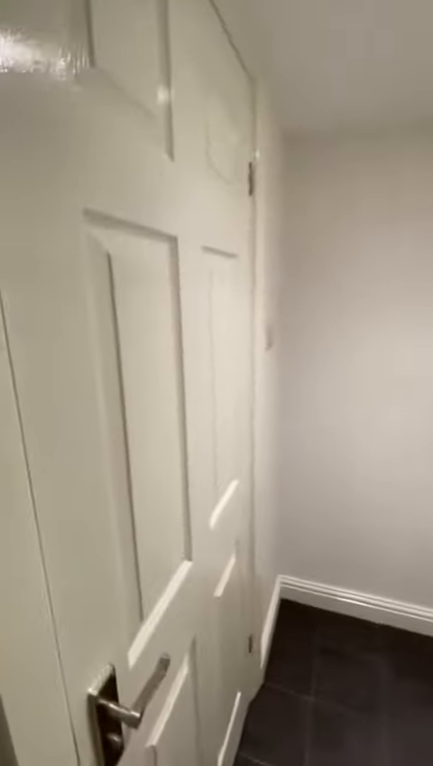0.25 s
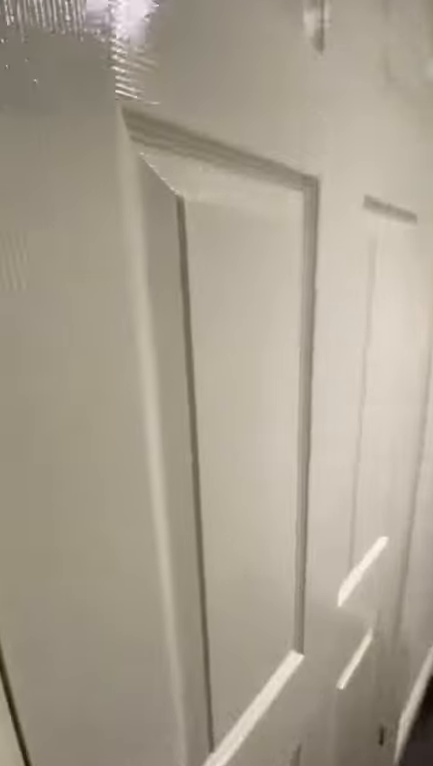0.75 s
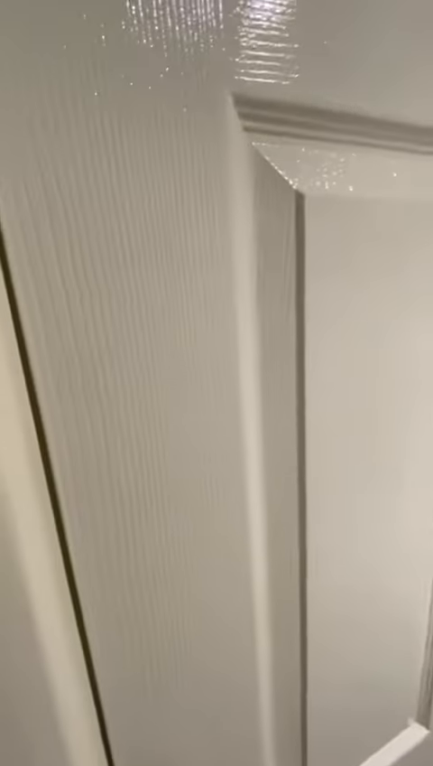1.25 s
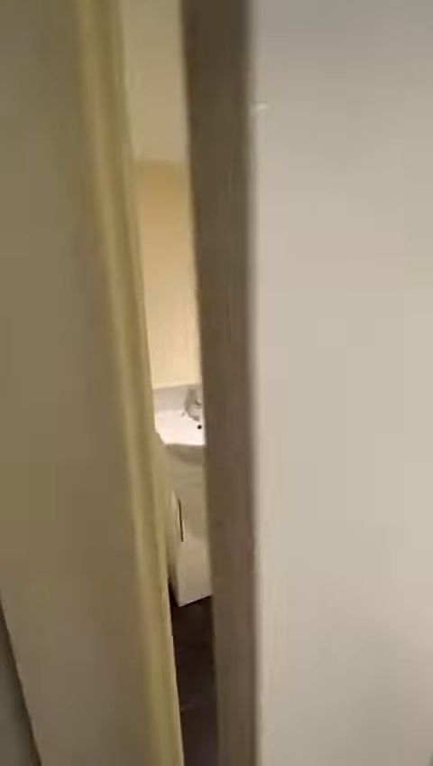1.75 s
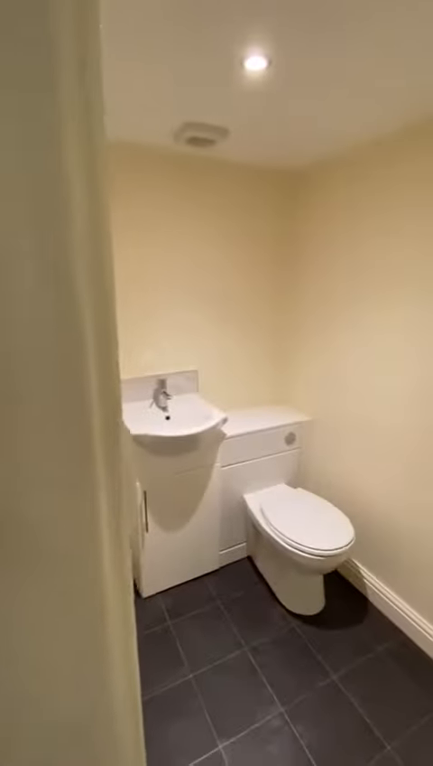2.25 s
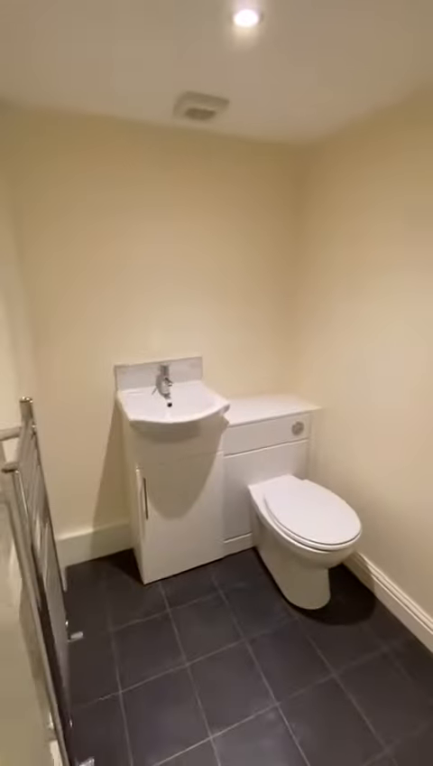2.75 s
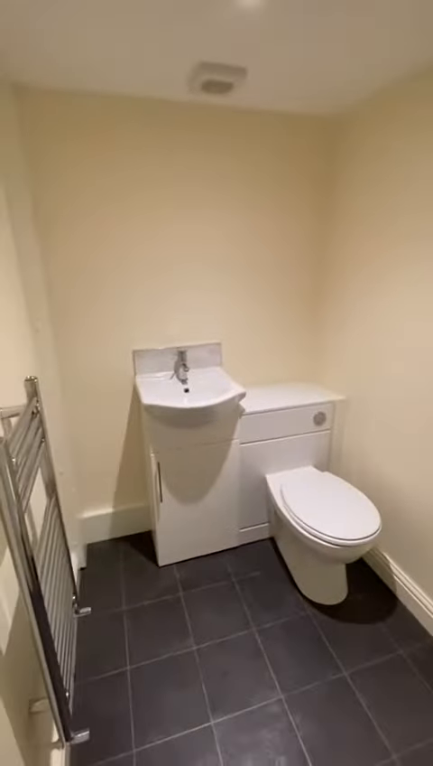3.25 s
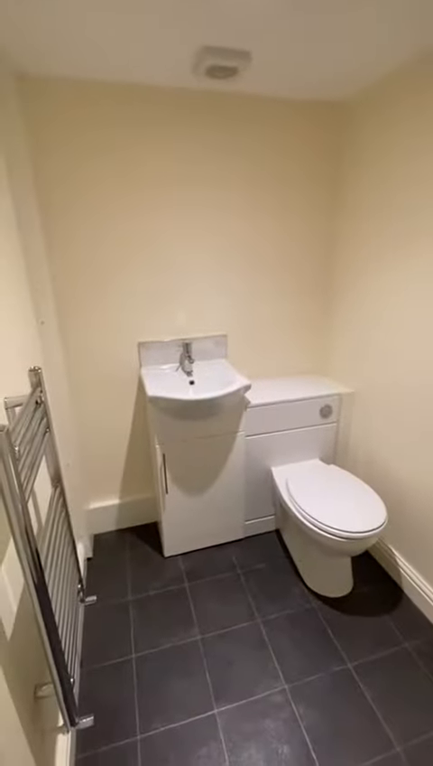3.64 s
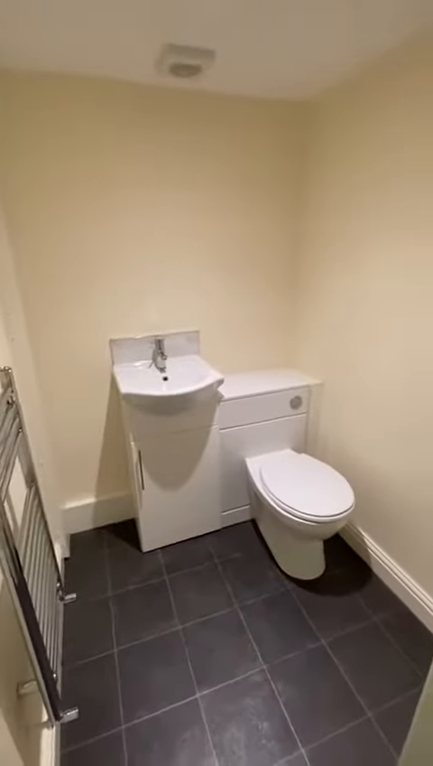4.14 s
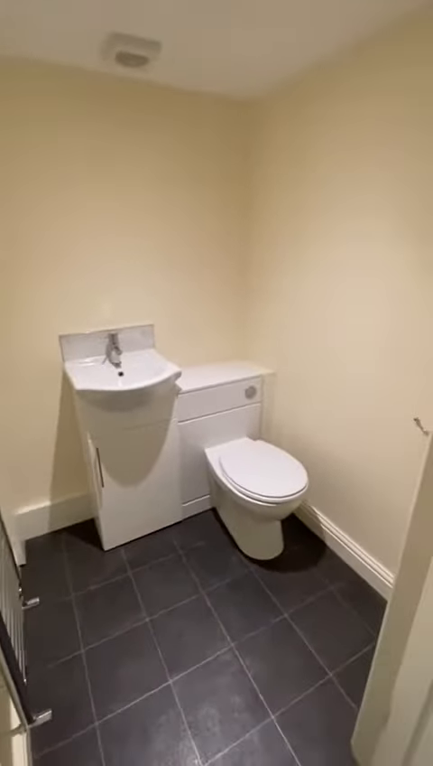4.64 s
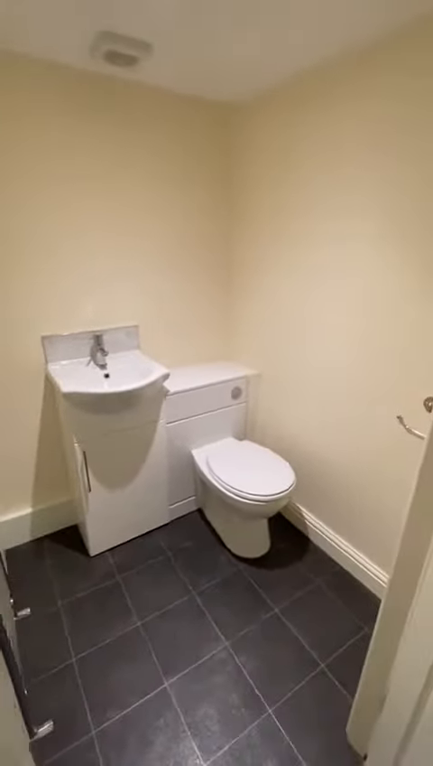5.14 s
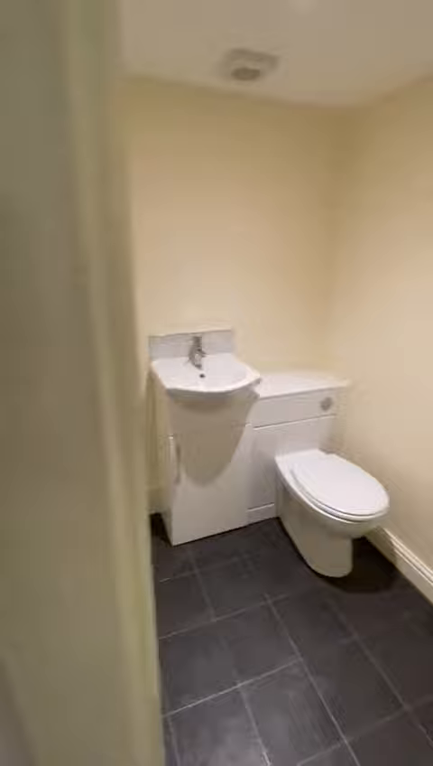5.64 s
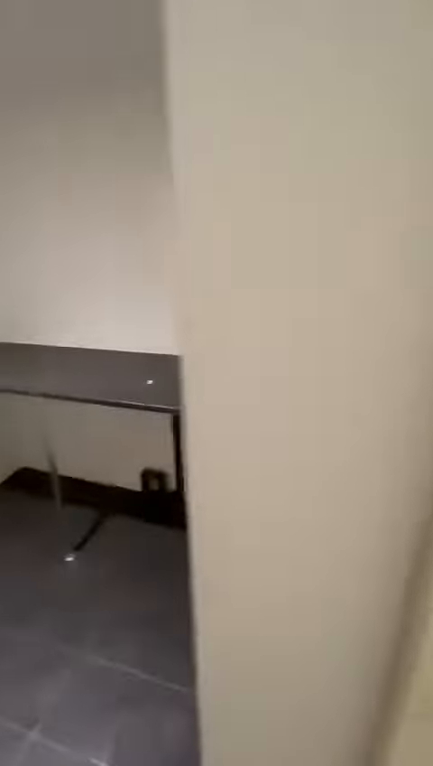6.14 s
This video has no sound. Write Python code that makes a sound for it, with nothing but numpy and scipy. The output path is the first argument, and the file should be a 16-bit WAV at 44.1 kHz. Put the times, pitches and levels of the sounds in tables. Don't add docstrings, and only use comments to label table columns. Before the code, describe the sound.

Close handheld stereo pickup indoors: first a muffled low hum and sleeve rustles, then handle clicks, a sharp woody latch clack, low door thumps and a short squeaky hinge. Soft steps and air bumps follow as the fan becomes much louder, its tonal drone wavering as the listener moves. Only faint rustles and a tiny tick interrupt it before the hum dulls slightly on leaving.

```python
import sys
import numpy as np
from scipy import signal
from scipy.fft import rfft, irfft
from scipy.io import wavfile
from scipy.ndimage import uniform_filter1d

SR = 44100
rng = np.random.default_rng(int(sys.argv[2]) if len(sys.argv) > 2 else 0)


def linear_from_db(decibels):
    return 10 ** (np.asarray(decibels, float) / 20)


def materialize(psi):
    bounded = np.clip(np.atleast_2d(psi).T, -1, 1)
    quanta = np.round(bounded * 32767).astype(np.int16)
    wavfile.write(sys.argv[1], SR, quanta)


N = 282240

# start_s, door_and_distance_loss_db, blade_standing_wave_db, octave_standing_wave_db (low at a node)
WALK = [(0.0, -14, -8.5, -9), (0.2, -24, -2, -5.5), (1.0, -14.5, -5, -2), (1.57, -14.5, -9.5, -3),
        (1.85, -2, -0.5, 1), (2.07, -1.5, -10, -1), (2.2, -2, -8, -8.5), (2.35, -0.5, 0.5, -1.5),
        (2.9, 0, -7.5, -3), (3.12, 0.47, -12, -4), (3.62, 0.5, -14, -5.5), (4.17, 0, -5.5, -4.5),
        (4.63, 0.28, -11.5, -6.5), (5.61, .1, -1, -4.5), (5.76, 0.5, -6.5, -5.5), (6.05, -3, 0, 3.5),
        (6.3, -6.5, -1, 6), (6.4, -6, -0.5, 1.5)]
# room_level_db at an antinode, share of the door loss, share of the standing wave
FAN_PARTS = dict(hum=(-39.5, 0.997, 0.01), blade=(-41, 0.926, 1.072), octave=(-58.5, 0.47, .01),
             low=(-49, 0.461, -0.302), high=(-46.5, 0.428, .2), air=(-53.5, 0.411, 0.015))
# pitch_hz, width_hz, level_db
SHAFT_ORDERS = [(63.9, 4.5, -19.5), (129.41, 3.2, -11), (163.87, 6.2, -5.5), (231.28, 8.3, -13.5),
                (259.8, 1, -23), (339.85, 24, -20.5), (403.6, 24, -23), (493, 4.3, -30.5)]
# freq_hz, density_db (per Hz)
DUCT_COLOUR = [(30, -25.5), (50, -22), (100, 3), (180, 0), (240, 6.5), (350, -5), (450, -23), (600, -44)]
# freq_hz, density_db (per Hz)
GRILLE_COLOUR = [(300, -15.5), (430, -6), (580, -5), (770, -2.5), (900, -3.5), (1140, -11), (1800, -14),
                 (2250, -15.5), (2600, -15.5), (3250, -14.5), (4200, -19.5), (5300, -17.5), (6000, -37),
                 (7500, -55.5)]
# pitch_hz, width_hz, level_db
SLOT_WHISTLES = [(770, 47, -17), (884.2, 2.9, -11), (2231.5, 100, -17), (3216, 110, -24.5)]
# freq_hz, side_minus_mid_db
PORT_SPREAD = [(150, -53), (330, -7), (800, -2), (1200, -1.5), (1700, -8), (2500, 2), (4500, 0.5),
               (5700, -6.5), (6300, -0.5), (7100, 9.5), (8500, 6), (9200, -3), (9900, -20), (11500, -17)]
# peak_s, level_db, fall_s (per 10 dB; negative swells slowly)
GUSTS = [(.25, -48.5, 0.24), (.8, -46, 0.05), (.93, -50, 0.29), (1.33, -37.5, 0.1128), (1.43, -43, 0.39),
         (2.0, -39.5, 0.28), (2.42, -36.5, 0.1025), (2.83, -47, 0.26), (4.3, -63, 0.04),
         (4.88, -58.5, -1.5), (5.55, -53.5, -0.29), (6.3, -58.5, 0.6)]
# peak_s, level_db, fall_s (per 10 dB), brightness_db
STROKES = [(.08, -57.5, 0.6106, 4.5), (0.532, -51.5, 0.1839, 3.5), (0.669, -53.5, 0.1469, 3.5),
           (.85, -57.5, 0.11, 1.5), (.95, -58, 0.02, -9), (1.179, -48, 0.1375, 5),
           (1.311, -40.5, 0.169, -4), (1.619, -50.5, 0.0846, 1), (1.78, -53.5, 0.4072, -1),
           (2.03, -60.5, 0.04, -2.85), (2.5, -59.5, 0.6227, 1.83), (4.3, -62, 0.37, 2.35),
           (4.7, -62.5, 0.3445, 0.14), (5.0, -70.5, 0.5043, -5.5), (5.38, -59.5, 0.1933, -0.67),
           (5.52, -55.5, 0.11, 8), (5.8, -65.5, 0.42, 6)]
# freq_hz, density_db (per Hz)
RUSTLE_COLOUR = [(500, -28), (900, 5.5), (1500, 0.84), (2800, 4), (4500, 2), (5600, 2), (6500, -2),
                 (7500, -26)]
# freq_hz, density_db (per Hz)
FIZZ_COLOUR = [(5500, -19), (6500, 10.5), (7500, 4), (8500, 3), (9500, 0.5), (10500, -1), (11400, -4.5),
               (12000, -22)]
# start_s, pitch_hz, level_db, t60_s
KNOCKS = [
    (1.292, 1450, -19, 0.0666),
    (1.416, 1113, -35.5, 0.274),
    (.001, 524.5, -42.5, 0.407),
    (.911, 323, -24.5, 0.13),
    (2.513, 640, -36, 0.045),
    (5.396, 11460, -54.5, .4),
]
# start_s, body_db, ring_db, t60_s
HANDLE = [
    (0.486, -48, -56, 0.81),
    (.747, -40.5, -41.5, 0.122),
    (0.784, -45, -44.5, 0.11),
    (0.9043, -28, -25.5, 0.0987),
    (0.918, -36, -37.5, 0.14),
    (1.1118, -43, -25.5, 0.044),
    (1.1295, -30, -27.5, 0.149),
    (1.1451, -31.5, -27.5, 0.11),
]
# start_s, body_db, ring_db, treble_db, t60_s
BOLT = [
    (1.2851, -24, -26, -14.5, 0.0257),
    (1.293, -43, -40.5, -24, 0.089),
    (1.3055, -37, -22, -34.5, 0.0648),
    (1.325, -38.5, -32.5, -35, 0.12),
    (1.841, -31.5, -57, -51, 0.087),
    (1.873, -38, -43.5, -42, 0.2992),
    (1.989, -50.5, -42.5, -59.5, 0.04),
    (5.5, -59, -53.5, -43, 0.485),
]
# freq_hz, density_db (per Hz)
LATCH_COLOUR = [(150, -40), (250, 2.5), (504, -12), (865, -2), (1410, -19.5), (1580, -7), (1950, -27.5),
                (2270, -10.5), (5000, -31.5), (6500, -55), (11000, -120)]
# peak_s, level_db, fall_s (per 10 dB; negative swells slowly)
JOLTS = [(1.12, -47.5, 0.1134), (1.14, -45, 0.54), (1.18, -32.5, 0.1244), (1.215, -32.5, 0.0884),
         (1.424, -34.5, 0.14), (1.5, -39.5, 0.28), (1.62, -40.5, 0.0963), (1.79, -34.5, 0.11),
         (1.87, -35, 0.02), (1.92, -35.5, 0.0047), (2.04, -43.5, -0.53)]
# freq_hz, density_db (per Hz)
LEAF_COLOUR = [(59, -14), (100, -0.5), (124, -12.5), (215, -6.5), (568, -14), (633, -13), (1070, -19.5),
               (1160, -20), (2500, -28.5), (3250, -38), (5500, -120)]
# start_s, peak_db, pitch_hz, length_s, glide (share)
THUDS = [
    (1.176, -31.5, 110.5, 0.102, -0.068),
    (1.21, -22.5, 68.2, 0.0808, -0.054),
    (1.282, -24.5, 51.3, 0.1196, -0.059),
    (1.929, -27.5, 59.85, 0.04112, 0.043),
    (2.206, -36.5, 100.7, 0.095, 0.256),
    (2.31, -31, 85.3, 0.0296, 0.088),
    (2.429, -27.5, 65.3, 0.044, 0.103),
    (2.525, -33.5, 50.5, 0.061, 0.00087),
]
# start_s, length_s, pitch_hz, level_db, roughness (0-1)
CREAKS = [(1.286, 0.063, 630.6, -41, 0.08), (1.41, 0.0228, 841.4, -37, 0.17),
          (1.517, 0.0112, 1292, -33, 0.2), (1.597, 0.0412, 997.5, -39.5, 0.18),
          (1.62, 0.06, 855, -41.5, 0.79), (1.67, 0.091, 970, -46, 0.8), (1.725, 0.088, 832, -38, 0.01),
          (1.79, 0.017, 389, -29.5, 0.5), (1.845, 0.024, 336.2, -32.5, 0), (1.89, 0.025, 304, -39, 0.3),
          (1.879, 0.065, 814.6, -43.5, 0.63), (5.08, 0.105, 2269, -54.5, 0.37)]
# start_s, length_s, pitch_hz, level_db, roughness (0-1)
SQUEAL = [
    (1.6, 0.051, 2436, -55, 0.95),
    (1.635, 0.05274, 2372, -47.5, 0.65),
    (1.684, 0.04, 2367, -27, 0.12),
    (1.708, 0.04, 2374, -30.5, 0.12),
    (1.735, 0.0476, 2345, -43.5, 0.36),
    (1.778, 0.069, 2362, -44.5, 0.26),
    (1.83, 0.082, 2375, -55, .95),
    (1.89, 0.133, 2372, -60.5, 0.91),
]
# freq_hz, below_neighbours_db
MASKING = [(100, -26), (700, -17.5), (1200, -7), (1700, -10), (3000, -3.5), (4200, -3), (6000, -3),
           (9000, -0.5), (11500, -2), (11900, 14)]

HUM_HZ, BEAT_HZ, BEAT_DB, BLADE_HZ = 200.0, 197.16, -13, 306.6
PAN_AT_ANTINODE_DB, PAN_PER_DB = -5.5, -1.4755
TREBLE_HZ, TREBLE_SHARE = 1300, .6
STILL_AIR_DB, STILL_CLOTH_DB, STILL_FIZZ_DB, FIZZ_DB = -63.5, -77, -92, -20
GUST_RISE, STROKE_RISE, JOLT_RISE = 0.78, 0.484, 0.639
HANDLE_HZ, HANDLE_EDGE_DB, BOLT_HZ = 1986, -26.5, 3387
KNOCK_BODY_DB, KNOCK_EDGE_DB = -14.5, -26
HANDLE_RING_SHARE, BODY_RISE_S = .4, 0.0026
ROOM_T60_S = 0.33
AUDIBLE_DB, ATTACK_DB = -82, 3


def rms_one(x):
    return x / np.sqrt(np.mean(x ** 2) + 1e-20)


def in_time(rows):
    s, *columns = np.transpose(rows)
    return [np.interp(np.arange(N) / SR, s, column) for column in columns]


def shape(spectrum, outside=-90):
    hz, db = np.transpose(spectrum)
    log_hz = np.log(np.arange(N // 2 + 1) * SR / N + 1e-3)
    return linear_from_db(np.interp(log_hz, np.log(hz), db, left=outside, right=outside))


def peak(hz, width_hz):
    offset = np.arange(N // 2 + 1) * SR / N - hz
    return 1 / (1 + (2 * offset / width_hz) ** 2)


def filtered_noise(gain):
    return rms_one(irfft(rfft(rng.standard_normal(N)) * gain, N))


def drift(hz):
    return filtered_noise(peak(0, 2 * hz))


def panned(x, db):
    return x * linear_from_db(np.array([db / 2, -db / 2]).reshape(2, -1))


def wide(mid, side):
    return np.array([mid + side, mid - side])


def diffuse(gain):
    ratio = shape(PORT_SPREAD, outside=-29.5)
    shares = np.array([np.ones_like(ratio), ratio]) / np.sqrt(1 + ratio ** 2)
    mid, side = irfft(rfft(rng.standard_normal((2, N))) * gain * shares, N)
    return rms_one(wide(mid, side))


def resonant(hz, width_hz, size):
    r = np.exp(-np.pi * width_hz / SR)
    zeros = [1, 0.0031, -1.014]
    poles = [1, -2 * r * np.cos(2 * np.pi * hz / SR), r * r]
    once = signal.lfilter(zeros, poles, rng.standard_normal(size))
    return rms_one(signal.lfilter(zeros, poles, once))


def humps(rows, rise, floor_db):
    t = np.arange(N) / SR
    power = linear_from_db(2 * floor_db)
    for s, db, fall in rows:
        away = np.maximum((t - s) / fall, (s - t) / (rise * fall))
        power = power + linear_from_db(2 * db - 20 * away)
    return 10 * np.log10(power)


def swell(s, length, rise):
    part = np.arange(int(length * SR)) / (length * SR)
    start = int(s * SR)
    return slice(start, start + len(part)), part, np.sin(np.pi * part ** rise)


def along_walk(part):
    loss_db, wave_db, octave_wave_db = in_time(WALK)
    room_db, loss_share, wave_share = FAN_PARTS[part]
    standing_db = octave_wave_db if part == "octave" else wave_share * wave_db
    return room_db + loss_share * loss_db + standing_db


def motor(hum_db, blade_db, pan_db, octave_db):
    turn = 2 * np.pi * np.arange(N) / SR
    lead = np.array([[.4], [-.4]])
    hum = np.sin(HUM_HZ * turn + lead / 7) + linear_from_db(BEAT_DB) * np.sin(BEAT_HZ * turn - 1.45)
    hum = np.sqrt(2) * linear_from_db(hum_db + 0.85 * drift(26.0)) * hum
    blade_phase = BLADE_HZ * turn + 1.625 * drift(0.76)
    blades = np.sqrt(2) * linear_from_db(blade_db + 0.5 + .4 * drift(3.9)) * np.sin(blade_phase + lead)
    octave = np.sin(2 * blade_phase + 0.17 * drift(6.0))
    octave = linear_from_db(octave_db + 2.0 + 1.3 * drift(7.9)) * octave
    return panned(hum, -.2) + panned(blades, pan_db) + panned(octave, -1.6)


def shaft_in_duct():
    duct = rms_one(shape(DUCT_COLOUR))
    for hz, width_hz, db in SHAFT_ORDERS:
        duct = duct + linear_from_db(db + 4.0) * rms_one(peak(hz, width_hz))
    below = np.arange(len(duct)) * SR / N < HUM_HZ
    low = linear_from_db(along_walk("low") + 1.5) * diffuse(duct * below)
    high = linear_from_db(along_walk("high") + 2.0) * diffuse(duct * ~below)
    return low + high


def shaded(air):
    top = signal.sosfilt(signal.butter(1, TREBLE_HZ, "high", fs=SR, output="sos"), air)
    loss_db = np.maximum(in_time(WALK)[0], -8.0)
    return air - top + linear_from_db(TREBLE_SHARE * loss_db) * top


def grille_air():
    colour = rms_one(shape(GRILLE_COLOUR))
    for hz, width_hz, db in SLOT_WHISTLES:
        colour = colour + linear_from_db(db) * rms_one(peak(hz, width_hz))
    return shaded(linear_from_db(along_walk("air") + 2.0 + 1.2 * drift(4.1)) * diffuse(colour))


def fan():
    pan_db = PAN_AT_ANTINODE_DB + PAN_PER_DB * in_time(WALK)[1]
    tones = motor(along_walk("hum"), along_walk("blade"), pan_db, along_walk("octave"))
    return tones + shaft_in_duct() + grille_air()


def buffeting():
    lumps = shape([(20, -29.5), (35, -1.5), (55, 4.0), (90, 4.5), (130, -17.5)])
    level_db = humps(GUSTS, GUST_RISE, STILL_AIR_DB) + 2.5 * drift(8.0)
    return linear_from_db(level_db) * wide(filtered_noise(lumps), linear_from_db(-20) * filtered_noise(lumps))


def sleeve():
    rustle_rows = [(s, db, fall) for s, db, fall, _ in STROKES]
    fizz_rows = [(s, db + FIZZ_DB + bright_db, fall) for s, db, fall, bright_db in STROKES]
    rustle_db = humps(rustle_rows, STROKE_RISE, STILL_CLOTH_DB)
    fizz_db = humps(fizz_rows, STROKE_RISE, STILL_FIZZ_DB)
    rustle = linear_from_db(rustle_db - 0.88 + 1.8 * drift(23.0)) * diffuse(shape(RUSTLE_COLOUR))
    fizz = linear_from_db(fizz_db + 8.5 + 1.0 * drift(8.6)) * diffuse(shape(FIZZ_COLOUR))
    return rustle + fizz


def contacts():
    knocks = [(s, db + KNOCK_BODY_DB, hz, db, db + KNOCK_EDGE_DB, t60, t60) for s, hz, db, t60 in KNOCKS]
    handle = [(s, body, HANDLE_HZ, ring, ring + HANDLE_EDGE_DB, t60, HANDLE_RING_SHARE * t60)
              for s, body, ring, t60 in HANDLE]
    bolt = [(s, body, BOLT_HZ, ring, edge, t60, t60) for s, body, ring, edge, t60 in BOLT]
    return knocks + handle + bolt


def clicks():
    age = np.arange(SR // 4) / SR
    body = filtered_noise(shape(LATCH_COLOUR))
    treble = diffuse(shape([(3000, 4.5), (4500, 2.57), (7000, 0.5), (9000, -3.0), (11800, -11.5)]))
    metal_onset = 1 - np.exp(-age / .0004)
    wood_onset = 1 - np.exp(-age / BODY_RISE_S)
    out = np.zeros((2, N))
    for s, body_db, hz, ring_db, treble_db, t60, metal_t60 in contacts():
        span = slice(int(s * SR), int(s * SR) + len(age))
        wood = linear_from_db(body_db - 6.0 - 60 * age / max(t60, .01)) * wood_onset * body[span]
        ring = linear_from_db(ring_db - 10.5) * resonant(hz, 0.49 * hz, size=len(age))
        metal = panned(ring, -2.2) + linear_from_db(treble_db - 7.5) * treble[:, span]
        metal_decay = linear_from_db(-60 * age / max(metal_t60, .01))
        out[:, span] += panned(wood, -2.2) + metal_onset * metal_decay * metal
    return out


def shudder():
    db = humps(JOLTS, JOLT_RISE, floor_db=-94.5)
    return linear_from_db(db - 4.5 + 2.3 * drift(21.0)) * diffuse(shape(LEAF_COLOUR))


def thuds():
    out = np.zeros(N)
    for s, db, hz, length, glide in THUDS:
        span, part, hump = swell(s, length, rise=0.853)
        cycles = hz * length * (part + glide * part ** 2)
        out[span] += linear_from_db(db) * hump * np.sin(2 * np.pi * cycles)
    return panned(out, 0.78)


def slips(rows, octave_db, spread):
    out = np.zeros(N)
    for s, length, hz, db, rough in rows:
        span, part, hump = swell(s, length, rise=0.708)
        phase = 2 * np.pi * hz * length * part
        clean = np.sin(phase) + linear_from_db(octave_db) * np.sin(2 * phase)
        grit = resonant(hz, spread * hz, size=len(part))
        out[span] += linear_from_db(db) * hump ** 0.76 * ((1 - rough) * clean + rough * grit)
    return out


def hinge():
    creaks = slips(CREAKS, octave_db=-22, spread=0.211)
    squeal = slips(SQUEAL, octave_db=-22, spread=0.019)
    return panned(creaks, -1.0) + panned(squeal, -8.0)


def room(x):
    age = np.arange(int(.6 * SR)) / SR
    tail = rng.standard_normal((2, len(age))) * linear_from_db(-60 * age / ROOM_T60_S) * (age > .004)
    tail = tail / np.sqrt(np.sum(tail ** 2, axis=1, keepdims=True))
    tail = signal.lfilter([.5], [1, -.5], tail)
    return signal.fftconvolve(x.mean(axis=0)[None], tail, axes=1)[:, :N]


def masked(x, start, size=1024, count=4):
    n, k = np.arange(2 * size) + .5, np.arange(size) + .5
    window = np.sqrt(2 / size) * np.sin(np.pi * n / (2 * size))
    basis = window[:, None] * np.cos(np.pi / size * np.outer(n + size / 2, k))
    pad = 2 * size - start
    padding = [(0, 0), (pad, 2 * size - (pad + N) % size)]
    blocks = np.pad([x[0] + x[1], x[0] - x[1]], padding).reshape(2, -1, size) / 2
    lines = np.concatenate([blocks[:, :-1], blocks[:, 1:]], axis=2) @ basis
    power = np.mean(lines.reshape(2, -1, size // count, count) ** 2, axis=3)
    around = uniform_filter1d(power.mean(axis=0), size=5, axis=1)
    around = uniform_filter1d(around, size=3, axis=0)
    hz, db = np.transpose(MASKING)
    mask_db = np.interp(k[::count] * SR / (2 * size), hz, db)
    mask = around * linear_from_db(2 * mask_db) + linear_from_db(2 * AUDIBLE_DB)
    treble = power[:, :, size // count // 3:].sum(axis=(0, 2))
    attack = treble > linear_from_db(2 * ATTACK_DB) * np.roll(treble, 1)
    mask[attack] *= linear_from_db(-33)
    halves = (lines * np.repeat(power > mask, count, axis=2)) @ basis.T
    joined = halves[:, 1:, :size] + halves[:, :-1, size:]
    return wide(*joined.reshape(2, -1)[:, pad - size:pad - size + N])


def scene():
    steady = fan() + buffeting() + sleeve()
    cracks = clicks()
    door = shudder() + thuds()
    squeaks = hinge()
    wet = room(linear_from_db(-5.0) * cracks + squeaks / 4)
    return steady + cracks + door + squeaks + wet


def top_cut(x):
    return signal.sosfilt(signal.butter(12, 12490, fs=SR, output="sos"), x)


def record(dry):
    mix = masked(dry, start=831)
    return top_cut(mix)


dry = scene()
out = record(dry)
materialize(out)
```